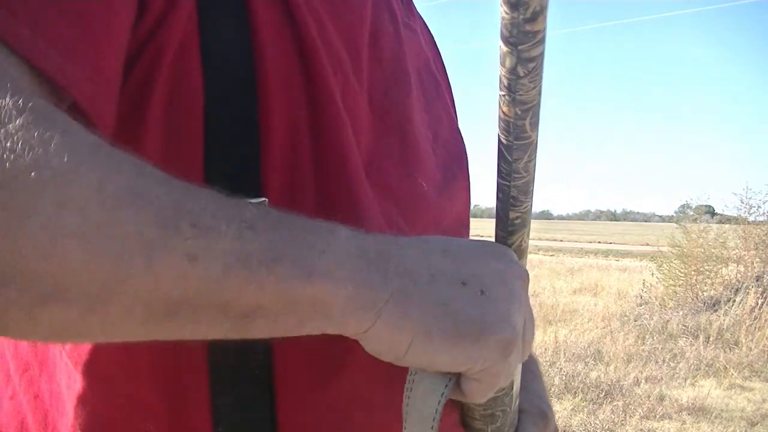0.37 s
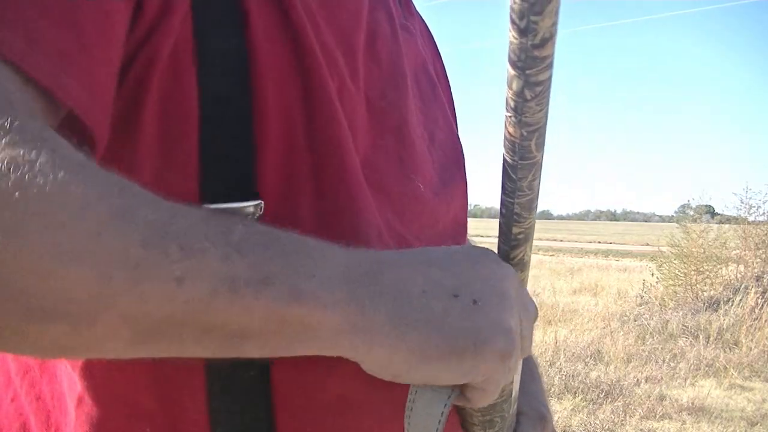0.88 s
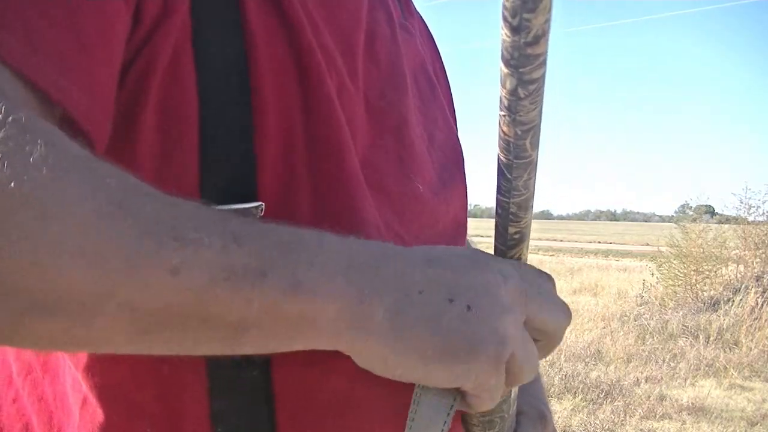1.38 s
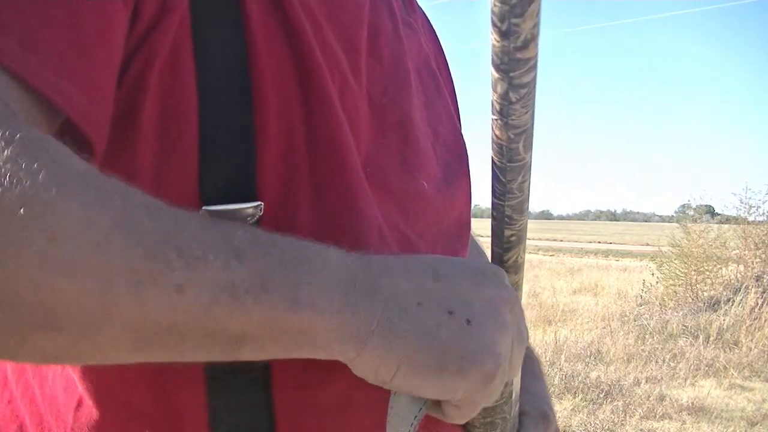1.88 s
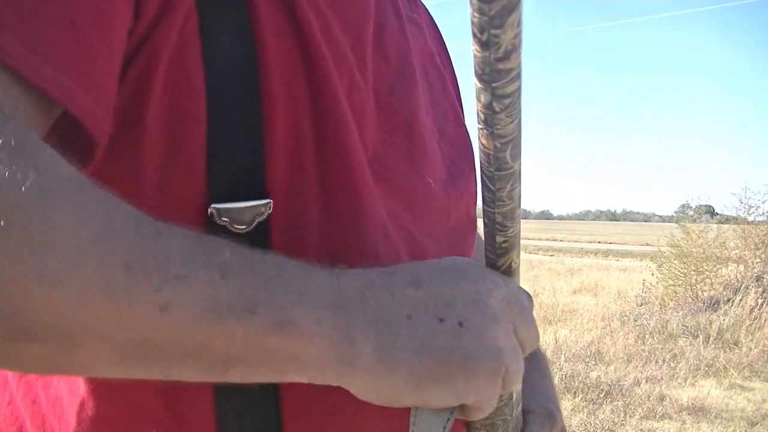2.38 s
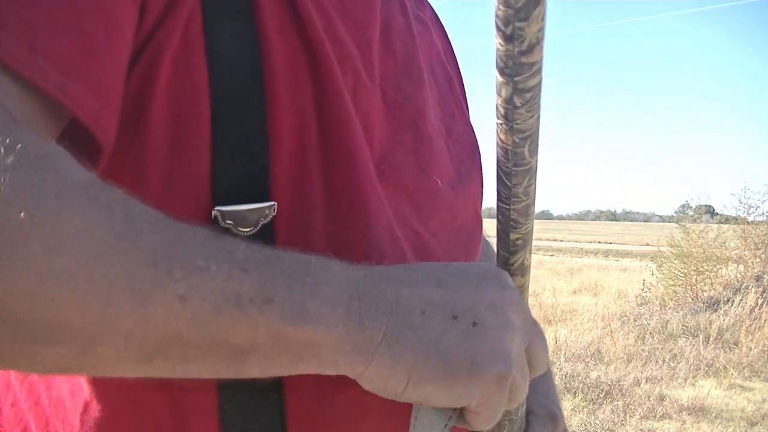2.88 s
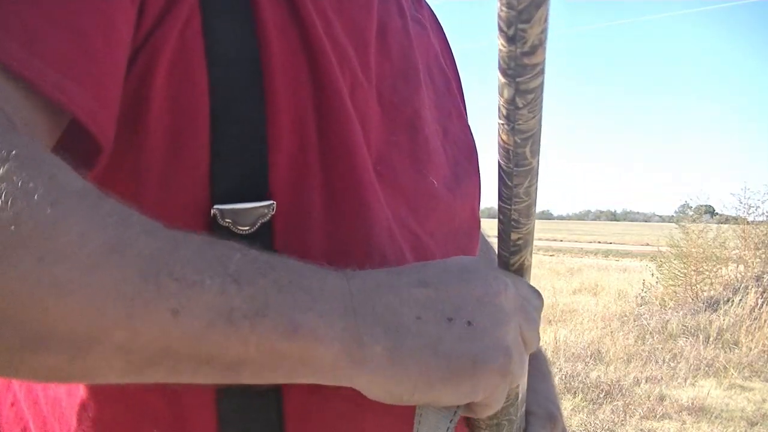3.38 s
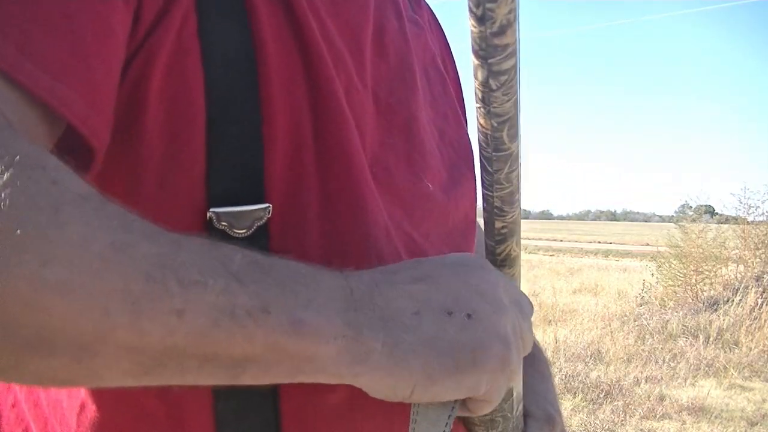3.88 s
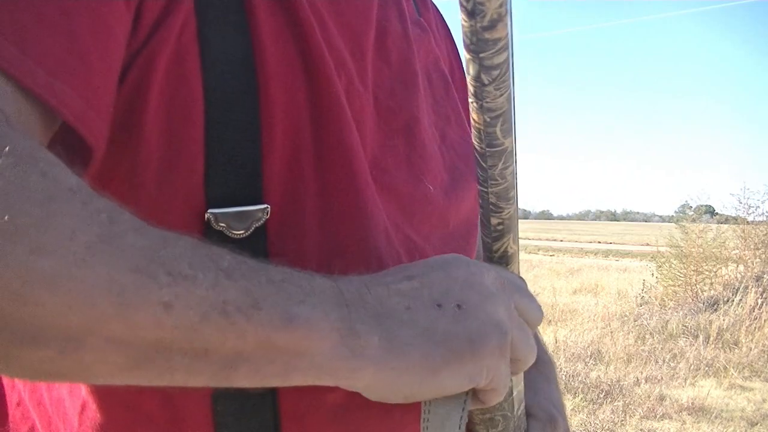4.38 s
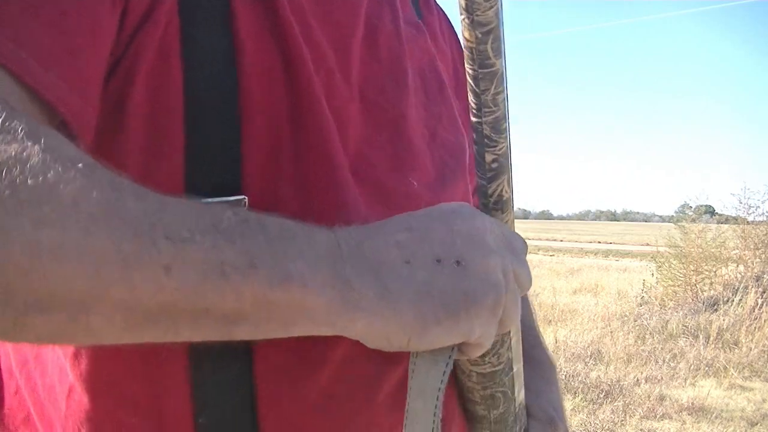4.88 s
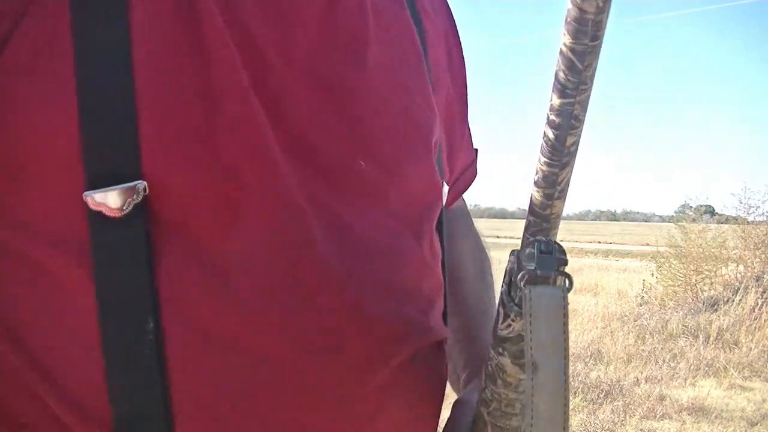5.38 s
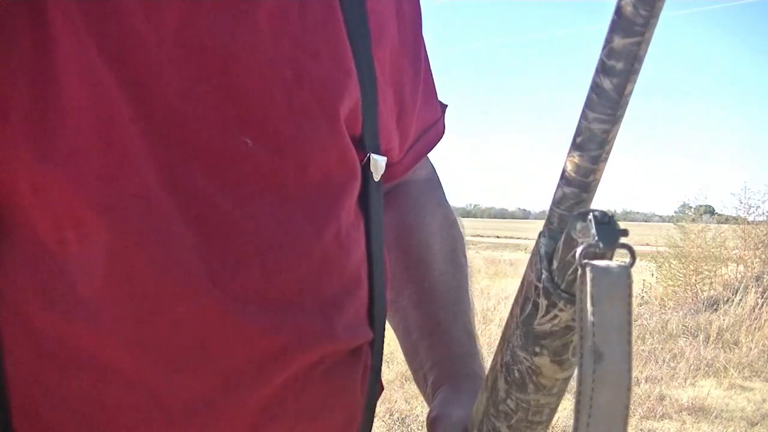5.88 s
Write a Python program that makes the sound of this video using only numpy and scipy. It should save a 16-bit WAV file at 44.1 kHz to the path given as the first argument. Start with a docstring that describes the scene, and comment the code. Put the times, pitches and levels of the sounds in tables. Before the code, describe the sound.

A close, dry stereo outdoor scene with no room echo. From 0 s a rapid cluster of metallic taps rings a shotgun's cap and barrel, while wind gusts rumble and thump the microphone. A duller barrel knock comes at 0.24 s, then short gritty thread rubs and scattered clicks, with another tight cluster of knocks around 0.92-1.0 s and a crisp pair near 1.22 s. Wind weakens after about 2 s. The loudest sharp clack rings at 2.35 s; smaller taps follow at 2.6-2.8 s and a bright snap at 2.94 s. From 3.0 to 4.1 s small ticks and scrapes come thickly, then grow sparse, with a hollow knock at 4.66 s. At 5.23 s a click and tiny high swivel clink sound, then soft cloth swishing continues to about 6.2 s with last light knocks. A faint high insect trill repeats roughly every 0.8 s over light hiss.

```python
"""In an open field, a hand turns the threaded steel cap of a shotgun an arm's length from a stereo microphone.
The thread rubs and its catch clicks: noise bursts filtered by the hollows of the cap.
Harder knocks ring the cap and long barrel as decaying modes; cloth swishes and a sling swivel clinks late on.
Wind buffets the microphone ports as shaped noise and low thumps.
An insect trills far off, a pulsed gliding tone, over a faint noise hiss."""
import sys
import numpy as np
from scipy import signal
from scipy.fft import rfft, irfft
from scipy.io import wavfile
from scipy.ndimage import uniform_filter1d

SR = 44100
rng = np.random.default_rng(int(sys.argv[2]) if len(sys.argv) > 2 else 0)


def voltage_ratio(decibels):
    """Convert decibels (scalar or array-like) to amplitude ratios, 20 dB per decade."""
    exponent = np.asarray(decibels, float) / 20
    return 10 ** exponent


def materialize(psi):
    """Save the field psi as 16-bit PCM at rate SR to the path in sys.argv[1].

    A 1-D psi becomes a single channel; in a 2-D psi each row is a channel.
    """
    bounded = np.clip(np.atleast_2d(psi).T, -1, 1)
    quanta = np.round(bounded * 32767).astype(np.int16)
    wavfile.write(sys.argv[1], SR, quanta)


N = 275184
TIME = np.arange(N) / SR  # s

# Knocks that ring the gun. Each row: start in seconds, sharp blow on the cap in dB,
# dull blow on the barrel in dB, lift of the long-ringing modes in a loose grip in dB.
KNOCKS = [(0.0, -40, -44, 11), (0.013, -29, -46, -21), (0.0255, -24, -43, -14), (0.0422, -27, -35.5, -7),
          (0.2377, -36, -22, -2), (0.9197, -36.5, -44, -13), (0.9362, -28.5, -32, -3.5),
          (0.98, -27.5, -36.5, -15), (1.005, -33.5, -69, -3.5), (1.2268, -24, -61, -4.5),
          (1.255, -37.5, -58, 0), (1.997, -39, -37.5, 5), (2.3488, -17.5, -40.5, -1.5),
          (2.607, -67, -43, -10), (2.736, -28, -48.5, -8), (2.771, -30.5, -59, -7),
          (2.7885, -33.5, -61, -3), (3.1234, -46, -28, -4), (3.947, -71, -37, -7),
          (4.6624, -46, -25.5, -3.5), (5.3095, -60, -33, -2.5), (5.8965, -60, -49, -7),
          (6.2106, -54, -31.5, 0)]
# Modes of cap and barrel. Each row: frequency in Hz, response to a cap blow in dB, response to a barrel
# blow in dB, 60 dB decay time in seconds, left minus right in dB, phase lead of the left in radians.
GUN_MODES = [(85, -31, -16.5, 0.18, 2, -1.4), (186, -15, 0, 0.16, 0, 0.16), (266.7, -8, -1.5, 0.075, 0, 0),
             (352.2, -9.5, -3.5, 0.23, -1, 0.15), (441.6, -11.5, -10.5, 0.22, -2, 0.5),
             (624.3, -45, -9, 0.15, 0.5, 0.16), (928.6, -20.5, -13.5, 0.16, 1.5, 0.5),
             (1142, -32, -28.5, 0.19, 23, 3.5), (1600, -12.5, -15.5, 0.6, -6, 1.3),
             (1643.4, 3, -34, 0.098, -8, 0.82), (1720, -5.5, -24, 0.15, -13, -0.7),
             (1977, -14, -7, 0.13, -11.5, 0.4), (2070, -11.5, -14, 0.23, -4, 1.2),
             (2295, -9.5, -10, 0.041, 5, 0.7), (2545, -20.5, -12, 0.13, 13.5, 0.7),
             (2673, -16, -27, 0.41, 5.5, 0.6), (3020, -17, -5.5, 0.093, -3, 0.5),
             (3430, -46, -38, .14, 0, 5.5), (3530, -2.5, -38, .11, 0, 0.3),
             (3620, -21.5, -40, 0.69, 3, 0.75), (3768, -38, -25, 0.098, -6, 10),
             (4140, -13.5, -26, 0.06, 6, -0.7), (4440, -5, -40, 0.057, -1, 1),
             (5120, -11, -24, 0.05, 3, -1.4), (5800, -29, -44, 0.22, -1, .3)]
# Strength of the wind on the ports. Each row: time in seconds, level in dB.
GUSTS = [(0.0, -27.5), (0.1, -19.5), (0.16, -37), (0.32, -31), (0.75, -33.5), (0.9, -31.5), (1.1, -39),
         (1.22, -35.5), (1.54, -45.5), (1.64, -35), (1.95, -55), (2.25, -45), (2.7, -62.5), (3.1, -49.5),
         (3.45, -59.5), (3.75, -80), (4.1, -90), (4.17, -59.5), (4.28, -66), (4.42, -49), (4.93, -63.5),
         (4.98, -95), (5.45, -59.5), (5.7, -68), (5.92, -53), (6.0, -53.5), (6.1, -45), (6.17, -49.5),
         (6.24, -32)]
# Spectrum of the wind. Each row: frequency in Hz, relative density in dB per Hz.
WIND_SPECTRUM = [(18, -59), (30, -26), (92, 0.5), (294, 1.5), (469, -9), (617, -19.5), (785, -23.5),
                 (1250, -37.5), (1400, -33.5), (1820, -63), (3080, -120)]
# Spectrum of the hiss. Each row: frequency in Hz, relative density in dB per Hz.
HISS_SPECTRUM = [(20, -45), (55, 3), (85, -4.5), (170, -2.5), (330, -25), (600, -18.5), (850, -20.5),
                 (1300, -18), (2500, -15.5), (7000, -19.5), (12000, -25), (17000, -32.5)]
# Clear contacts of catch and thread. Each row: start in seconds, level in dB,
# brightness in dB gained per band from body to middle to tick, 60 dB decay time of body and middle in seconds.
CLICKS = [(0.0254, -32.5, 1.5, .056), (0.042, -40, 0, .039), (0.22, -29, -2.5, 0.05),
          (0.238, -39.5, -10, 0.18), (0.4922, -33.5, -6, 0.032), (0.73, -45, -4, .036),
          (0.7773, -38, -7, 0.027), (0.937, -37.5, -1, 0.063), (0.979, -34, -2.5, 0.062),
          (1.0858, -33.5, -5, 0.052), (1.1768, -48.5, -15, 0.038), (1.2172, -28.5, 3.5, 0.035),
          (1.2276, -35, -2, .043), (1.6405, -51.5, -15, .024), (1.829, -36.5, -4.5, 0.083),
          (1.8955, -48.5, -12, 0.06), (1.998, -37, -9, 0.078), (2.3475, -19.5, -0.5, 0.045),
          (2.449, -34.5, 2.5, 0.017), (2.5323, -46, -1, 0.027), (2.605, -50.5, -12, 0.075),
          (2.6451, -44.5, 1.5, 0.016), (2.735, -33.5, -0.5, 0.059), (2.7727, -38.5, -4, .059),
          (2.79, -46.5, -1, 0.034), (2.901, -44, -10, 0.033), (2.9253, -37, -7, 0.015),
          (2.9443, -23, 6.5, 0.026), (3.032, -46.5, -3, .027), (3.0611, -41, -5.5, 0.039),
          (3.1244, -45, -19.5, 0.037), (3.1655, -44, -3, 0.045), (3.207, -34, -6, 0.021),
          (3.223, -37.5, 2, 0.036), (3.2391, -38, 15, 0.014), (3.2612, -37, 11, 0.011),
          (3.3046, -51, 14, 0.018), (3.3931, -48.5, -10, 0.042), (3.474, -37.5, -4, 0.058),
          (3.5035, -45, -12, 0.053), (3.5444, -36.5, -2, 0.029), (3.5735, -39.5, -3, 0.095),
          (3.585, -50, 17, .022), (3.6022, -36.5, 3, 0.039), (3.6217, -32.5, -7.5, 0.02),
          (3.778, -55, -7, 0.048), (3.9471, -35, -1, 0.022), (3.9705, -32, 0, 0.025),
          (4.0046, -42, 5, 0.035), (4.0707, -41.5, 2, 0.043), (4.4225, -48.5, -2, 0.034),
          (4.454, -47, -5, .027), (4.6622, -33.5, -7, 0.069), (4.74, -35, 0, 0.024),
          (4.7678, -44.5, 13.5, 0.024), (5.042, -51, 0, 0.042), (5.1732, -37.5, -7.5, 0.078),
          (5.186, -42, 3, .035), (5.2279, -29, 3, 0.046), (5.3104, -47, -9, 0.032), (5.49, -47, -2, 0.0085),
          (5.8951, -39.5, -4.5, 0.017), (6.208, -53.5, -19.5, .046)]
# Strokes of thread, hand and cloth. Each row: start in seconds, length in seconds, level in dB,
# brightness in dB gained per band, swell from start to end in dB.
STROKES = [(0.115, .1, -53.5, -2, 14), (0.349, 0.15, -56.5, -3, 17), (0.506, 0.23, -70, -9, -5),
           (0.688, 0.12, -54.5, -2, 1), (0.873, 0.042, -64, -12, 5), (0.99, .1, -54, -1.5, 3),
           (1.165, 0.12, -57, -7.5, 2), (1.29, 0.088, -54, -2, 11), (1.365, 0.06, -63, -6.5, 0),
           (1.472, 0.049, -53.5, -6.5, 8), (1.587, .13, -55, -2.5, 7), (1.734, 0.11, -64, -7.5, 7),
           (1.9, 0.1, -57.5, 0.5, 16), (2.054, 0.081, -63, -4, 5), (2.147, 0.095, -59, -6.5, 7),
           (2.225, 0.12, -58, -1, 6), (2.42, .06, -54.5, -7, -3), (2.515, 0.12, -55.5, -4, -1),
           (2.683, 0.097, -62, -7, 9), (2.807, .081, -57.5, -6, 11), (2.879, 0.098, -50, -4.5, -3),
           (3.156, 0.065, -60, -6, -5), (3.202, 0.078, -50, -7.5, 11), (3.273, 0.06, -64.5, -9.5, -16),
           (3.461, 0.12, -63, 0, -6), (3.554, .098, -59, -3, 2), (3.817, 0.092, -74.5, -11, 10),
           (3.924, 0.2, -66, -1, -14), (4.274, 0.042, -67, -6, 2), (4.422, 0.064, -65, -4, -3),
           (4.489, 0.064, -68.5, -9, 0), (4.738, .051, -64, 2, -14), (5.153, 0.099, -57.5, -2.5, -2),
           (5.249, .13, -58, 0, -7), (5.43, 0.071, -49, 0, 0), (5.488, 0.13, -64.5, -1, -8),
           (5.92, .25, -66.5, 4, -6), (6.074, 0.058, -54.5, 0, 9), (6.12, 0.16, -63.5, 1, 7)]
# Hollows of the cap, one list each for the body, middle and tick bands.
# Each row: resonance in Hz, width in Hz, level in dB.
HOLLOWS = [
    [(1071, 386, 0), (1374, 274, 0), (1670, 736, 0)],
    [(2310, 980, 2.5), (3325, 960, 1), (4215, 980, -0.5)],
    [(5530, 1730, 4), (6930, 2050, -3.5), (8520, 3440, -5.5), (12100, 5500, -8.5)],
]
# Position of the hand. Each entry, by band: left minus right in dB.
HAND_PAN_DB = [0, 0.9, 3]
# Unlikeness of the hand noise at the ports. Each entry, by band: difference relative to common part [ratio].
HAND_APART = [0.15, 0.12, 0.39]
# Single eddies that thump a port. Each row: peak time in seconds, peak level in dB,
# frequency in Hz, left minus right in dB.
THUMPS = [(0.096, -23, 266, 6), (.365, -34.5, 318, 6), (0.561, -32, 286, -7), (0.914, -34, 250, 5),
          (1.327, -29, 172, 3), (1.484, -29.5, 252, 7), (1.736, -33, 187, 3), (2.211, -31.5, 242, -3),
          (2.287, -34, 230, 8), (3.446, -41.5, 205, 12), (4.448, -39, 234, 12), (4.828, -45, 218, 12),
          (4.935, -48.5, 200, -8), (5.927, -39, 221, 14), (6.051, -39, 173, 6), (6.084, -34, 168, 9),
          (6.178, -38.5, 165, 11)]
# Cloth swishing as the body turns. Each row: time in seconds, level in dB.
SWISH = [(5.2, -78), (5.35, -64), (5.55, -63), (5.75, -60.5), (5.9, -59.5), (6.05, -64), (6.24, -59)]


def colour(x, points):
    """Spectral shaping: weight the noise by (Hz, dB) points and bring it to rms 1."""
    hz, db = np.transpose(points)
    bins = np.maximum(np.arange(N // 2 + 1) * SR / N, 1)
    gain = voltage_ratio(np.interp(np.log(bins), np.log(hz), db))
    y = irfft(rfft(x) * gain, N)
    return y / y.std()


def walk(rate):
    """Random modulation: levels held for 1 / rate seconds and slewed twice, with a spread near 1."""
    k = max(int(SR / rate), 2)
    held = np.repeat(rng.standard_normal(N // k + 1), k)
    return 1.06 * uniform_filter1d(uniform_filter1d(held, k), k)[:N]


def pan(db):
    """Level difference between ports: left and right gains that are db apart."""
    return voltage_ratio(np.array([[0.5], [-0.5]]) * db)


def two_ports(mid, side, apart):
    """Partial coherence: both ports share mid and receive side with opposite signs."""
    return mid + apart * side * np.array([[1], [-1]])


def hollow(x, modes, gains):
    """Cavity resonance: each mode filters twice, so valleys stay dark; white noise keeps an rms near 1."""
    out, power = 0, 0
    for k, (hz, width, db) in enumerate(modes):
        b, a = signal.iirpeak(hz, hz / width, fs=SR)
        resonance = signal.lfilter(b, a, signal.lfilter(b, a, x))
        out = out + (-1) ** k * voltage_ratio(db) * gains[k] * resonance
        power += voltage_ratio(2 * db) * np.pi / 2 * width / SR
    return out / np.sqrt(power)


def gun():
    """Modal vibration: every knock excites all modes, each radiating its own way towards the two ports."""
    cap_top_hz, barrel_top_hz = 4900, 2600  # above these a blow loses force
    scatter_db, long_ring_s = 2, 0.35
    chatter_db, chatter_rad = 3, 0.51
    out = np.zeros((2, N))
    s, cap_blow_db, barrel_blow_db, loose_db = np.transpose(KNOCKS)
    at = (s * SR).astype(int)
    push = np.hanning(7)  # spreads each blow smoothly over about 0.1 ms
    push /= push.sum()
    chatter = [walk(rate) for rate in (45.09, 60.5, 80.3, 109.5)]
    scatter = scatter_db * rng.standard_normal((len(KNOCKS), len(GUN_MODES)))
    for k, (hz, cap_db, barrel_db, t60, pan_db, lead) in enumerate(GUN_MODES):
        size = voltage_ratio(scatter[:, k] + loose_db * (t60 > long_ring_s))
        # the softer contact on the barrel is duller
        sharp = voltage_ratio(cap_db + cap_blow_db) * size / (1 + (hz / cap_top_hz) ** 2)
        dull = voltage_ratio(barrel_db + barrel_blow_db) * size / (1 + (hz / barrel_top_hz) ** 2)
        force = np.zeros(N)
        force[at] = sharp + dull
        force = np.convolve(force, push)[:N]
        pole = np.exp(2j * np.pi * hz / SR - np.log(1000) / (t60 * SR))
        ring = (-1) ** k * signal.lfilter([1], [1, -pole], force + 1e-18)
        # loose parts touch and let go while it rings
        ring *= voltage_ratio(chatter_db * chatter[k % len(chatter)])
        ring *= np.exp(1j * chatter_rad * chatter[(k + 1) % len(chatter)])
        phase = np.exp(1j * np.array([[0.5], [-0.5]]) * lead)
        out += pan(pan_db) * np.imag(ring * phase)
    return out


def wind(own_db=3.0, apart=0.58, alike_hz=91.6, calm_db=-46.0, split_hz=327.0, bass_follows=0.38):
    """Turbulent pressure: eddies thud partly on both ports, partly on each; the largest cover both."""
    gust = np.interp(TIME, *np.transpose(GUSTS))
    gust = gust + 2 * walk(20) + walk(35)  # uneven bumps, dB
    mid, side = (colour(voltage_ratio(own_db * walk(90)) * rng.standard_normal(N), WIND_SPECTRUM) for _ in range(2))
    side = signal.lfilter(*signal.butter(1, alike_hz, "high", fs=SR), side)
    port_level = voltage_ratio(np.array([walk(15), walk(31)]) / 2)
    air = port_level * two_ports(mid, side, apart)
    bass = signal.filtfilt(*signal.butter(2, split_hz, fs=SR), air)
    # a stronger gust is brighter: the deepest rumble grows less than the rest
    bass_level = calm_db + bass_follows * (gust - calm_db)
    return voltage_ratio(gust) * (air - bass) + voltage_ratio(bass_level) * bass


def hiss(level_db=-60.5, apart=0.78, alike_hz=153.0):
    """Stationary noise of far field and microphone: alike at both ports in the bass, less so above."""
    mid, side = (colour(rng.standard_normal(N), HISS_SPECTRUM) for _ in range(2))
    side = signal.lfilter(*signal.butter(1, alike_hz, "high", fs=SR), side)
    return voltage_ratio(level_db) * two_ports(mid, side, apart)


def insect(start_hz=8240, end_hz=8500, fast=85.0, slow=46.0, uneven_db=2.0, waver_hz=30.0, pan_db=5.0):
    """Amplitude and frequency modulation: steady phrases climb in pitch and swell while their pulses slow."""
    first_end_s, every_s, phrase_s = 0.80, 0.7875, 0.43  # end of the first whole phrase, period, length
    u = 1 - ((first_end_s - TIME) % every_s) / phrase_s  # 0 to 1 through a phrase, negative in the rest
    done = np.clip(u, 0, 1)
    climb = 1 / (1 + np.exp(-(done - 0.7) / 0.09))
    hz = start_hz + (end_hz - start_hz) * climb + waver_hz * walk(150)
    tone = np.sin(2 * np.pi * np.cumsum(hz) / SR)
    pulses_per_s = fast + (slow - fast) * np.clip(3 * done - 1.4, 0, 1)
    beat = np.sin(np.pi * np.cumsum(pulses_per_s) / SR) ** 2
    swell = voltage_ratio(-73 + 6 * done)
    uneven = voltage_ratio(uneven_db * (walk(60) + walk(1.3)))
    return (u > 0) * swell * tone * beat * uneven * pan(pan_db)


def cap():
    """Stick-slip friction and impact: gritty rubs and crack-and-tail clicks pass through the cap's hollows."""
    grit_db, flicker_db, patchy_db, edge_s = 2.0, 2.5, 2.5, 0.021
    slip_rate, slip_size, slip_s = 70.0, 0.71, 0.001  # slips per second, relative size, decay in s
    rise_s, crack_s, tail_db, tick_share = 0.00043, 0.00047, -5, 0.55
    rub_middle_db, click_middle_db = 1.5, 1  # the middle band stands this far above the slope
    out = np.zeros((2, N))
    stick = flicker_db * walk(70)  # the grip slips and catches
    slips = (rng.random(N) < slip_rate / SR) * rng.exponential(size=N)
    # tiny ticks in every band
    slips = 1 + slip_size * signal.lfilter([1], [1, -np.exp(-1 / (slip_s * SR))], slips)
    for band, modes in enumerate(HOLLOWS):
        drive = np.zeros(N)
        for s, length, db, bright_db, swell_db in STROKES:
            start = int(s * SR)
            t = np.arange(min(int(length * SR), N - start)) / SR
            edges = np.clip(np.minimum(t, length - t) / edge_s, 0, 1)
            level = db + bright_db * (band - 1) + rub_middle_db * (band == 1)
            drive[start:start + len(t)] += edges * voltage_ratio(level + swell_db * (t / length - 0.5))
        grit = np.repeat(rng.exponential(size=N // 8 + 1), 8)[:N] - 2.5
        drive *= slips * voltage_ratio(stick + grit_db * grit)
        for s, db, bright_db, t60 in CLICKS:
            start = int(s * SR)
            t = np.arange(min(4000, N - start)) / SR
            t60 = t60 * (tick_share if band == 2 else 1)  # the tick is the shortest part
            shape = np.exp(-t / crack_s) + voltage_ratio(tail_db - 60 * t / t60)
            shape *= (1 - np.exp(-t / rise_s)) ** 2
            level = db + bright_db * (band - 1) + click_middle_db * (band == 1)
            drive[start:start + len(t)] += voltage_ratio(level) * shape
        patches = [voltage_ratio(patchy_db * walk(28)) for _ in modes]  # the moving fingers open and close each hollow
        mid, side = (hollow(drive * rng.standard_normal(N), modes, patches) for _ in range(2))
        out += pan(HAND_PAN_DB[band]) * two_ports(mid, side, HAND_APART[band])
    return out


def thumps(overtone=1.865, overtone_db=-7, wobble_rad=0.86, fade_cycles=1.17):
    """Transient pressure pulses: each eddy gives a few uneven low cycles, swelling and fading."""
    out = np.zeros((2, N))
    drift = wobble_rad * walk(80)
    for s, db, hz, pan_db in THUMPS:
        near = slice(int((s - 0.05) * SR), int((s + 0.05) * SR))
        cycles = hz * (TIME[near] - s)
        turn = 2 * np.pi * cycles + drift[near]
        shape = np.exp(-(cycles / fade_cycles) ** 2)  # falls to 1 / e over fade_cycles
        wave = np.cos(turn) + voltage_ratio(overtone_db) * np.cos(overtone * turn)
        out[:, near] += voltage_ratio(db) * pan(pan_db) * shape * wave
    return out


def cloth(hz=2250.0, width=2300.0, apart=0.26, strap_hz=2480.0, strap_width=280.0, strap_db=7.0):
    """Friction noise: shirt and strap give a soft band of noise with a narrower peak."""
    drive = voltage_ratio(np.interp(TIME, *np.transpose(SWISH), left=-120) + 2.5 * walk(30))
    modes = [(hz, width, 0), (strap_hz, strap_width, strap_db)]
    mid, side = (hollow(drive * rng.standard_normal(N), modes, [1, 1]) for _ in range(2))
    return two_ports(mid, side, apart)


def swivel(start=5.229, hz=6700.0, db=-44, t60=0.15):
    """Damped free vibration: the sling swivel clinks once as the hand lets go."""
    t = np.maximum(TIME - start, 0)
    return voltage_ratio(db - 60 * t / t60) * np.sin(2 * np.pi * hz * t)


def scene():
    """Superposition: all sources add in open air, without a room."""
    return gun() + wind() + hiss() + insect() + cap() + thumps() + cloth() + swivel()


def band_limit(x):
    """A steep low-pass at the top of the band."""
    return signal.sosfilt(signal.butter(12, 16660, fs=SR, output="sos"), x)


def record(dry):
    """Band limitation: a steep elliptic low-pass cuts the top above 16.5 kHz."""
    low_pass = signal.ellip(8, 0.2, 70, 16500, fs=SR, output="sos")
    mix = signal.sosfilt(low_pass, dry)
    return band_limit(mix)


dry = scene()
out = record(dry)
materialize(out)
```